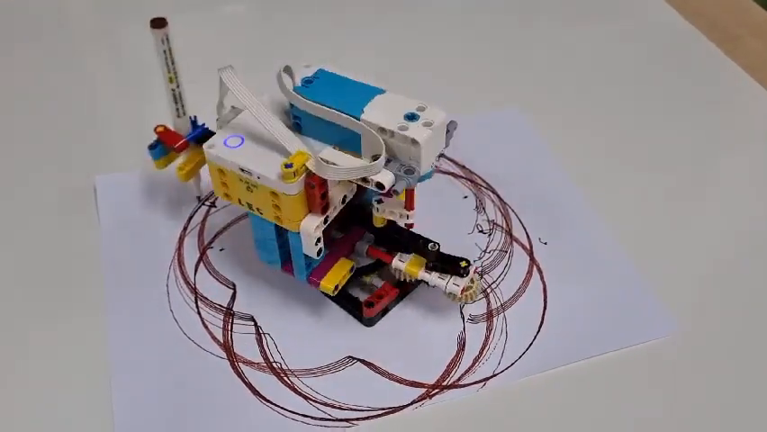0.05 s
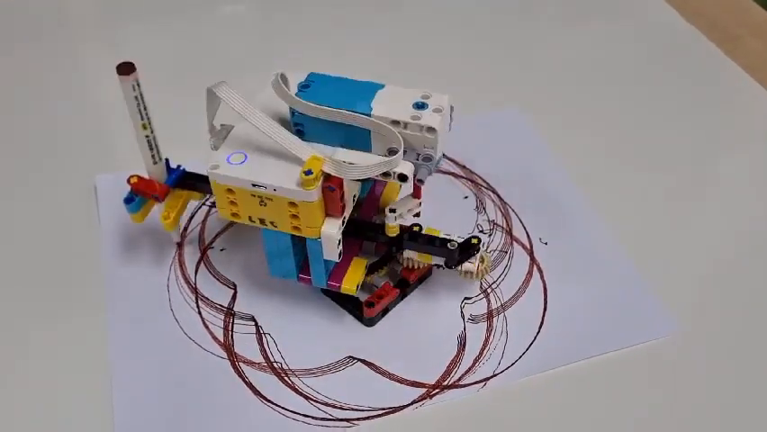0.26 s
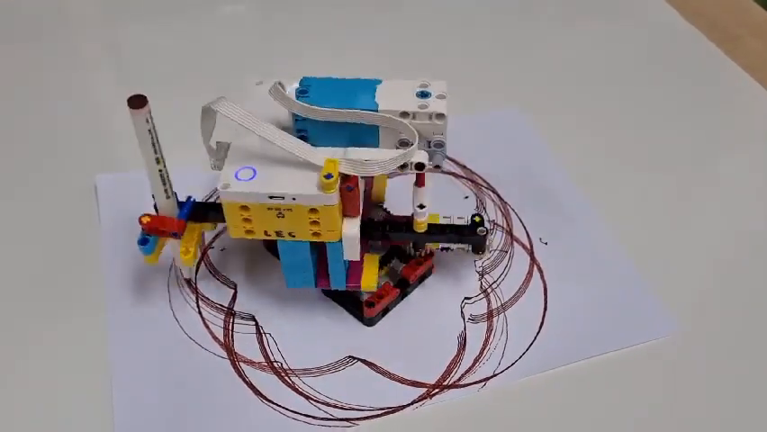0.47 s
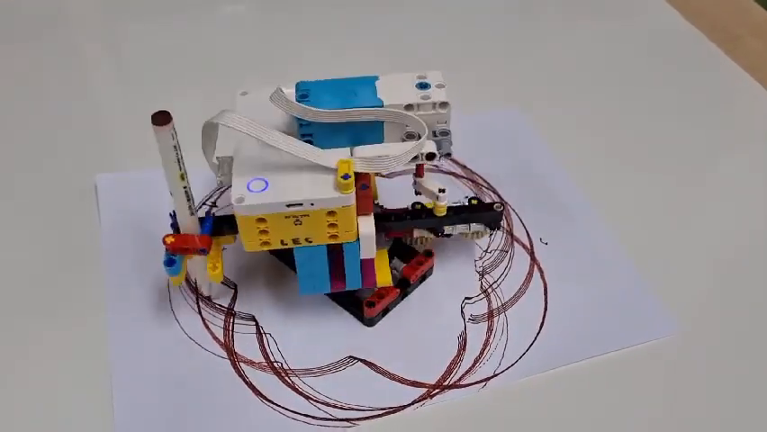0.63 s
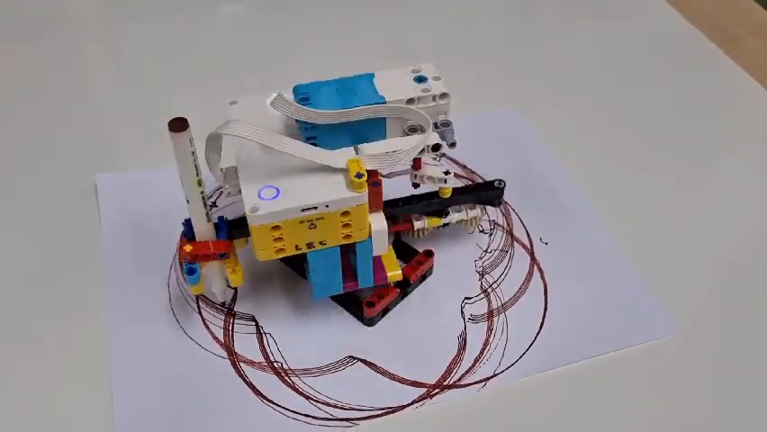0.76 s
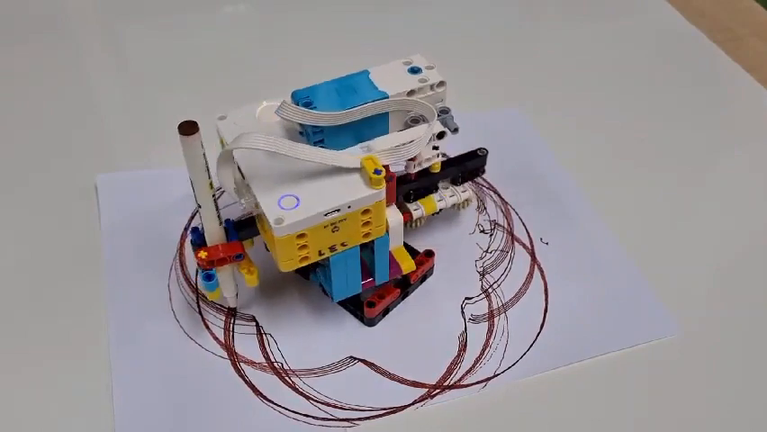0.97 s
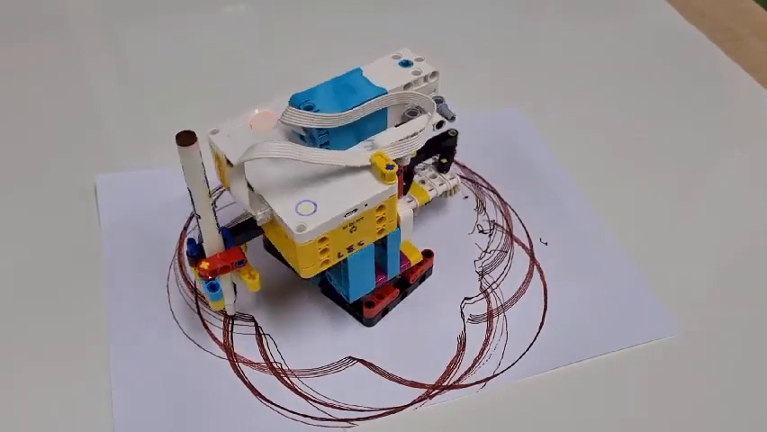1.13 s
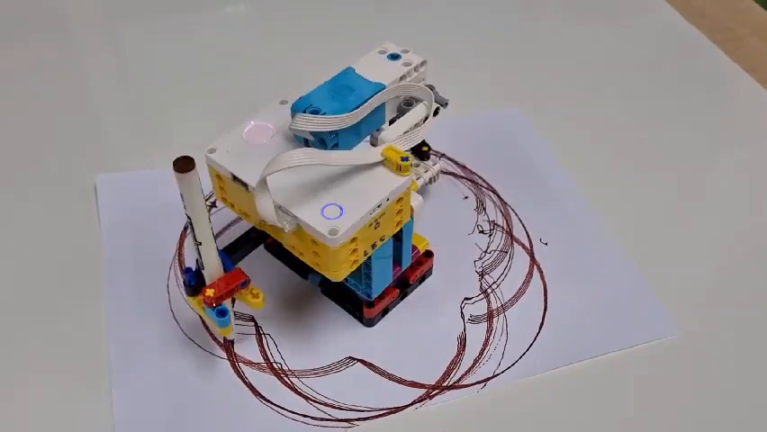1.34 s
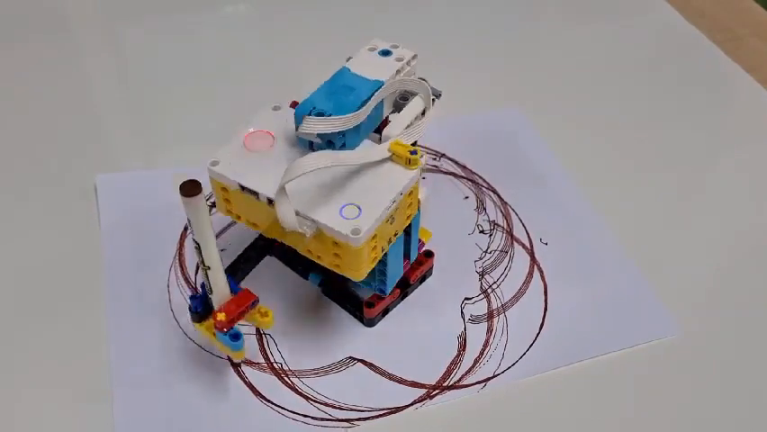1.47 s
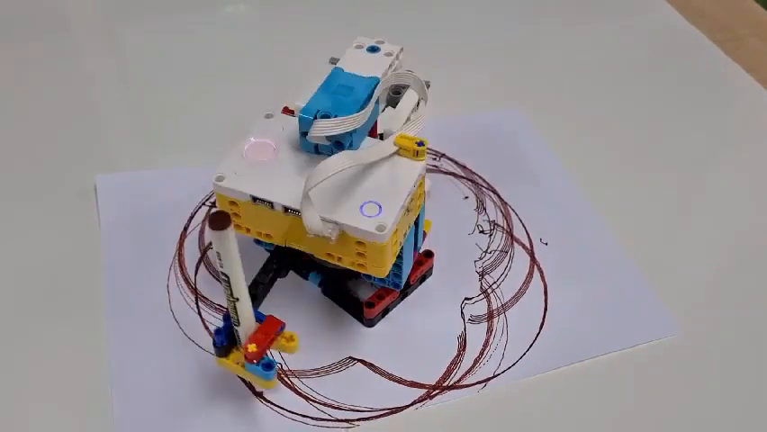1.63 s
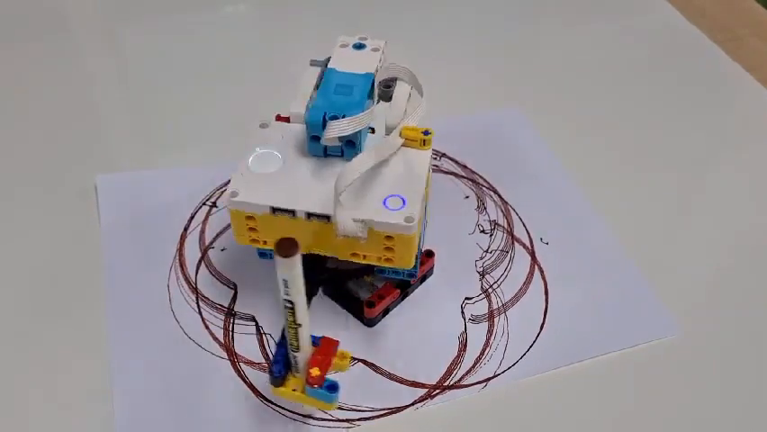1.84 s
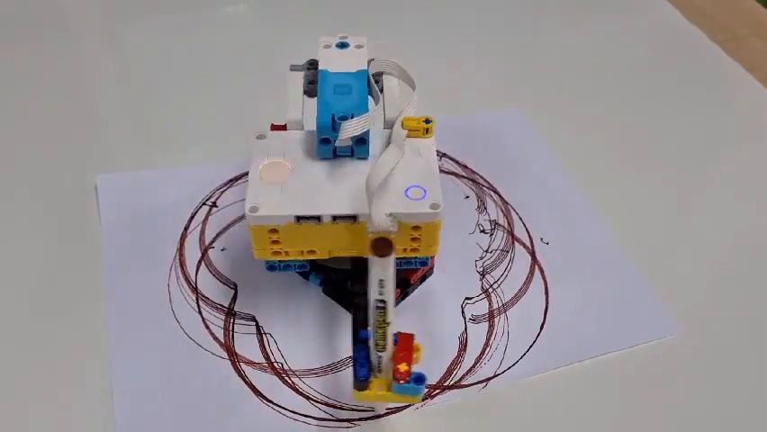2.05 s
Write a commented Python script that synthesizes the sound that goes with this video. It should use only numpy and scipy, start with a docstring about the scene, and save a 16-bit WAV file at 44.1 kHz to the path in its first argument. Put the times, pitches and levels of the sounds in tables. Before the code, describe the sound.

Thin electric whine of a little toy motor, with early plastic clacks over faint room rumble

```python
"""In a hard-walled room a small toy motor whines on a table over ventilation rumble, hiss and a low hum.
The rumble and hiss are one shaped noise; the hum is a sine of wandering pitch.
Plastic parts knock and clack: impulses ring damped modes, blurred by a decaying noise echo.
The motor sums sines at multiples of a fixed switching rate, with side tones spaced by the
commutator rate, and adds gear noise beating at that rate."""
import sys
import numpy as np
from scipy import signal
from scipy.fft import rfft, irfft, next_fast_len
from scipy.io import wavfile
from scipy.ndimage import map_coordinates

SR = 44100
rng = np.random.default_rng(int(sys.argv[2]) if len(sys.argv) > 2 else 0)


def to_wav(sig):
    """Store sig (one row per channel, or 1-D mono) as 16-bit WAV at the path in sys.argv[1].

    Samples outside -1..1 are clipped; the rate is SR.
    """
    pcm = np.clip(np.atleast_2d(sig), -1, 1) * 32767
    pcm = np.round(pcm).astype(np.int16)
    wavfile.write(sys.argv[1], SR, pcm.T)  # frames by channels


N = 92610  # length [samples]
SIDES = np.array([[.5], [-.5]])  # left and right each take half of a difference
STEADY_LEAD_S = 0.00017  # the left port leads in the air and gear noise


def amp(db):
    """Decibel law: the amplitude ratio of a level."""
    return 10 ** (np.asarray(db) / 20)


def unit(x):
    """Normalisation to a root-mean-square of one."""
    return x / np.sqrt(np.mean(x ** 2) + 1e-20)


def along(points, hz):
    """Interpolation of (frequency [Hz], value) points on a logarithmic frequency axis."""
    f, v = np.transpose(points)
    return np.interp(np.log(hz + 1), np.log(f + 1), v)


def wobble(rate):
    """Slow random modulation: a smooth curve through random knots, rate of them a second."""
    knots = rng.standard_normal(int(N * rate / SR) + 4)
    return map_coordinates(knots, [np.arange(N) * rate / SR])


def filtered(x, response):
    """Linear filtering: the spectrum is multiplied by a complex response."""
    n = x.shape[-1]
    padded = next_fast_len(n + 8192)
    hz = np.fft.rfftfreq(padded, 1 / SR)
    return irfft(rfft(x, padded) * response(hz), padded)[..., :n]


def spread(pair, alike, gain, lead_s):
    """Interchannel coherence: a shared and an opposed signal are mixed, coloured, and lead on the left."""
    def mix(hz):
        turn = np.arccos(np.clip(along(alike, hz), 0, 1)) / 2
        lead = np.exp(2j * np.pi * hz * lead_s * SIDES)
        shared = np.cos(turn) * np.array([[1], [1]])
        opposed = np.sin(turn) * np.array([[1], [-1]])
        return gain(hz) * lead * np.array([shared, opposed])
    return filtered(pair[:, None], mix).sum(axis=0)


# Noise spectrum before scaling: (frequency [Hz], relative level [dB per Hz])
AIR_SPECTRUM = [(50, -4), (70, -11.5), (130, -2.5), (200, -5.5), (350, -6.5), (500, -12.5), (800, -10),
                (1600, -18.5), (2500, -12.5), (3500, -26), (5000, -36), (7500, -26.5), (12000, -34),
                (14500, -68), (15700, -81)]
# Left-right coherence of the air noise: (frequency [Hz], likeness [0 to 1])
AIR_ALIKE = [(60, 0.92), (150, 1), (300, 0.74), (700, 0.052), (1500, 0.94), (3000, 0.23), (12000, 0.21)]
# Room tones in the rumble: (centre [Hz], width [Hz], boost [dB])
ROOM_TONES = [(106.4, 16, 5), (117.4, 28, -3.5), (177.7, 9.3, 9.5), (205, 34.5, 7.5), (270, 26, 2.5),
              (359, 21, 5)]
AIR_DB, AIR_WAVER_DB = -52.5, 1  # rms before the waver
HUM_HZ, HUM_WAVER_HZ = 41.5, 0.85
HUM_DB, HUM_WAVER_DB = -65.5, 2.5  # rms before the waver


def air():
    """Broadband flow noise with resonant peaks, and a hum with frequency and amplitude modulation."""
    def colour(hz):
        peaks_db = sum(db / (1 + ((hz - centre) / width * 2) ** 2) for centre, width, db in ROOM_TONES)
        return amp(along(AIR_SPECTRUM, hz) + peaks_db) * (hz > 48)

    noise = rng.standard_normal((2, N))
    rush = unit(spread(noise, AIR_ALIKE, colour, STEADY_LEAD_S))
    rush = rush * amp(AIR_DB + AIR_WAVER_DB * wobble(6.17))
    phase = 2 * np.pi * np.cumsum(HUM_HZ + HUM_WAVER_HZ * wobble(4.4)) / SR
    hum = np.sqrt(2) * amp(HUM_DB + HUM_WAVER_DB * wobble(6.55)) * np.sin(phase)
    return rush + hum


# Reverberation time: (frequency [Hz], time to fall 60 dB [s])
ROOM_DECAY = [(200, 0.28), (1000, 0.37), (2500, 0.29), (5000, 0.33), (12000, 0.35)]
BUILD_S, DIRECT_DB = .002, -9  # build-up of the tail; direct sound relative to the tail's norm
EARLY_DB, EARLY_S = -1.5, 0.0062  # the table and near walls answer first, above the tail


def echo():
    """Statistical reverberation: random noise builds up, then each frequency dies at its own rate."""
    n = SR // 2
    hz, t, bands = signal.stft(rng.standard_normal((2, n)), SR, nperseg=256)
    decay = amp(-60 * t / along(ROOM_DECAY, hz)[:, None])
    tail = signal.istft(bands * decay, SR, nperseg=256)[1][:, :n]
    age = np.arange(n) / SR
    build_up = 1 - np.exp(-age / BUILD_S)
    early = 1 + amp(EARLY_DB) * np.exp(-age / EARLY_S)
    tail = tail * build_up * early
    tail = tail / np.linalg.norm(tail[0])
    tail[:, 0] += amp(DIRECT_DB)
    return tail


# Knocks: (time [s], rms level over the first 50 ms [dB], rattle length [s],
#   tilt above the turn [dB per octave], treble burst [dB], bass shelf [dB])
KNOCKS = [(0.098, -55.5, 0.009, -2.5, 6, 7), (0.206, -38.5, 0.0032, -7, -7, 0),
          (.215, -36, 0.0029, -6.5, -10, -1), (0.249, -44, 0.017, -14, -5, -11),
          (0.398, -36, 0.0065, 4, 3.5, -1), (0.406, -33.5, 0.0068, -23, -10.5, -4.5),
          (0.44, -30, 0.0084, 0.5, 8, -4), (0.451, -31, 0.0071, 2, 11, -2.5),
          (0.497, -39, 0.032, 1.5, 6.5, 3.5), (0.6, -43.5, 0.26, 3, 3, 1),
          (0.672, -29.5, 0.0036, -6, -2, -6.5), (0.682, -31, 0.0082, 2, 6.5, 3),
          (0.699, -32, 0.0068, -6.5, -3.5, 1), (0.756, -43.5, 0.026, -4.5, -17, -20),
          (0.914, -44.5, 0.02, 2.5, 15, 3), (1.028, -51.5, .02, -18, -21, -7),
          (1.418, -55.5, 0.017, -23, -21, 1), (1.656, -46, 0.021, -0.5, 9.5, 3),
          (1.695, -54, 0.0087, 2, 12, 5), (1.761, -50.5, 0.025, -3.5, -8, -7),
          (1.959, -54, 0.024, -16, -1, -7)]
# Modes of the plastic body before scatter: (frequency [Hz], width [Hz], relative level [dB])
BODY_MODES = [(233, 110, -3.5), (282.6, 40, -3.5), (424, 107, -12), (520, 62, -3.5), (783, 111, -0.5),
              (916, 39, 4.5), (997, 85, 4), (1158, 40, 4), (1289, 29.3, 4), (1498, 104, -2),
              (1818, 230, 0.5), (2268, 123, 2), (2415, 163, 0.5), (2833, 156, 0.5), (3750, 370, -14)]
# Treble burst spectrum before each knock's treble setting: (frequency [Hz], relative level [dB])
TREBLE_SPECTRUM = [(2000, -24), (3500, -21), (5000, -24), (7000, -22.5), (9500, -28), (13000, -26),
                   (15000, -37.5), (15700, -40)]
# Left-right coherence of knocks and gear noise: (frequency [Hz], likeness [0 to 1])
ROOM_ALIKE = [(150, 1), (300, 1), (700, 0.5), (1500, 0.32), (3000, 0.45), (12000, 0.11)]
MODE_SCATTER_DB = 1.5
RATTLE_PER_S, RATTLE_DB = 560, 0.5  # contacts within a rattle, their scatter
GRAINS_PER_S, GRAINS_DB = 2500, 0  # density of random treble grains in each knock, their scatter
TURN_HZ, BASS_HZ = 950, 470  # corners of the tilt and the bass shelf
LOW_CUT_HZ = 120  # the small body radiates little below this
KNOCK_LEAD_S = 0.00029  # the left port hears the knocks first


def body(hz, mode_gains, tilt_db, bass_db):
    """Modal superposition: damped resonances of alternating sign, tilted, with a radiation low cut."""
    ring = 0
    for k, ((centre, width, db), gain) in enumerate(zip(BODY_MODES, mode_gains)):
        damping = 1j * hz * width
        ring = ring + (-1) ** k * gain * amp(db) * damping / (centre * centre - hz * hz + damping)
    lean_db = tilt_db * np.log2(1 + (hz / TURN_HZ) ** 4) / 4
    lean_db = lean_db + bass_db / (1 + (hz / BASS_HZ) ** 4)
    return ring * amp(lean_db) * (1j * hz / (LOW_CUT_HZ + 1j * hz)) ** 2


def in_room(source, colour, n):
    """Convolution: every impulse of the source starts the room's answer."""
    answer = signal.fftconvolve(echo(), source[None], axes=1)[:, :n]
    return spread(answer, ROOM_ALIKE, colour, KNOCK_LEAD_S)


def knocks():
    """Impact excitation: fading contacts ring the body; each knock adds a treble noise burst, soft in onset."""
    n = SR // 2
    out = np.zeros((2, N + SR))
    t = np.arange(n // 4) / SR
    for start_s, db, length_s, tilt_db, treble_db, bass_db in KNOCKS:
        mode_gains = amp(MODE_SCATTER_DB * rng.standard_normal(len(BODY_MODES)))
        fade = np.exp(-(t / length_s) ** 2)

        touch = rng.random(len(t)) < RATTLE_PER_S / SR
        sign = rng.choice([-1, 1], size=len(t))
        contacts = touch * sign * amp(RATTLE_DB * rng.standard_normal(len(t))) * fade
        contacts[0] = 1  # the blow itself

        grains = (rng.random(len(t)) < GRAINS_PER_S / SR) * rng.standard_normal(len(t))
        grains = grains * amp(GRAINS_DB * rng.standard_normal(len(t)))
        burst = grains * t / length_s * fade
        # equal energy before colouring
        burst = burst * np.linalg.norm(contacts) / (np.linalg.norm(burst) + 1e-9)

        heard = in_room(contacts, lambda hz: body(hz, mode_gains, tilt_db, bass_db), n)
        heard = heard + in_room(burst, lambda hz: amp(along(TREBLE_SPECTRUM, hz) + treble_db), n)
        onset_rms = np.sqrt(np.mean(heard[:, :SR // 20] ** 2))
        out[:, round(start_s * SR):][:, :n] += amp(db) * heard / onset_rms
    return out[:, :N]


# Course of the motor: (time [s], commutator rate before waver [Hz], effort [dB])
MOTOR_COURSE = [(0, 69, -9), (0.201, 65.7, 0), (.4, 65.6, 4), (.85, 66.56, 0), (1.05, 68.6, 1),
                (1.3, 67.82, 4), (1.45, 70.05, 3.5), (1.6, 66.4, 0.5), (1.8, 64.96, 2), (1.952, 69.7, -1),
                (2.1, 69.2, 1.5)]
# Tones: (multiple of the switching rate, multiple of the commutator rate,
#   rms level before effort and waver [dB], left-right difference [dB], left lead [rad])
WHINE_TONES = [(1, 0, -62.5, 0, 1.2), (1, 1, -64.5, -5.5, 1.92), (2, -1, -78, -1.5, 4.1),
               (2, 0, -63, 11, 1.86), (2, 1, -61, -1, 2.08), (2, 2, -66.5, 5, 1.97)]
# Gear noise spectrum before scaling: (frequency [Hz], relative level [dB per Hz])
GEAR_SPECTRUM = [(500, -3.5), (800, -16), (1250, -2), (1550, -15), (2200, -7), (2550, -2), (3000, -16),
                 (3600, -17.5)]
SWITCH_HZ = 1200
WAVER_DB, WAVER_HZ = 1, 0.51  # wander of each tone's level and of the commutator rate
GEARS_DB, GEARS_PULSE = -56.5, 0.19  # rms before effort; depth of the beat at the commutator rate
GEARS_FOLLOW = 0.033  # share of the effort's dB swing heard in the gear noise


def motor():
    """Modulation sidebands: commutator tones flank the switching harmonics; gear noise beats in step."""
    t = np.arange(N) / SR
    course_s, rate_hz, effort_db = np.transpose(MOTOR_COURSE)
    commutator_hz = np.interp(t, course_s, rate_hz) + WAVER_HZ * wobble(12.75)
    turn = 2 * np.pi * np.cumsum(commutator_hz) / SR
    effort_db = np.interp(t, course_s, effort_db)

    whine = np.zeros((2, N))
    for switch_k, turn_k, db, pan_db, lead in WHINE_TONES:
        level = np.sqrt(2) * amp(db + pan_db * SIDES + WAVER_DB * wobble(8.91))
        phase = 2 * np.pi * switch_k * SWITCH_HZ * t + turn_k * turn + lead * SIDES
        whine += level * np.sin(phase)

    beat = rng.standard_normal((2, N)) * (1 + GEARS_PULSE * np.sin(turn))
    gears = unit(spread(beat, ROOM_ALIKE, lambda hz: amp(along(GEAR_SPECTRUM, hz)), STEADY_LEAD_S))
    return amp(effort_db) * whine + amp(GEARS_DB + GEARS_FOLLOW * effort_db) * gears


def scene():
    """Superposition: the sound pressures of all sources add."""
    return air() + knocks() + motor()


# Difference between the two ports: (frequency [Hz], left-right level [dB])
PORT_BALANCE = [(200, 0), (380, -1), (700, -1), (1300, 0), (2400, -5.5), (4400, 2.5), (8100, -1),
                (15000, -0.5)]
TOP_HZ = 15700


def record(dry):
    """Band limitation: the two ports favour different bands, and nothing passes above the limit."""
    return filtered(dry, lambda hz: amp(along(PORT_BALANCE, hz) * SIDES) * (hz < TOP_HZ))


dry = scene()
out = record(dry)
to_wav(out)
```